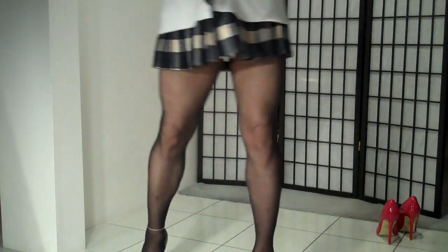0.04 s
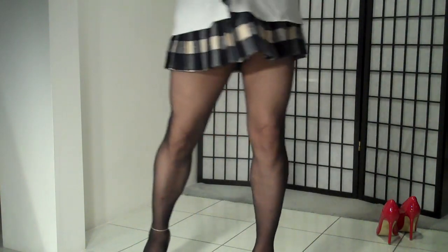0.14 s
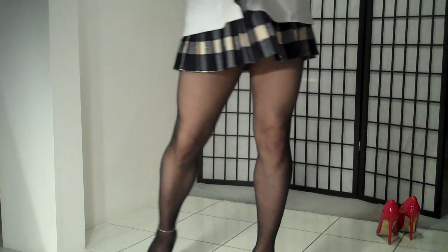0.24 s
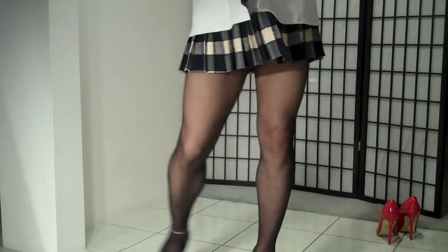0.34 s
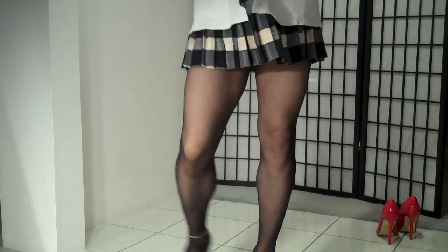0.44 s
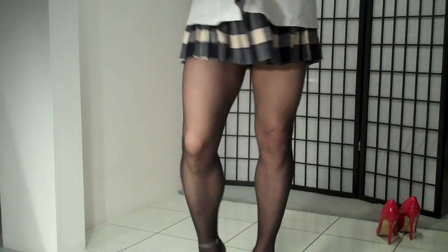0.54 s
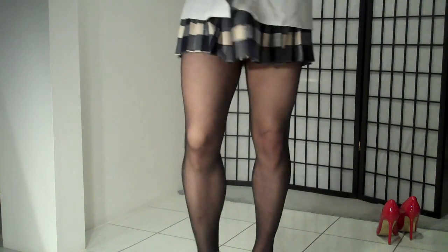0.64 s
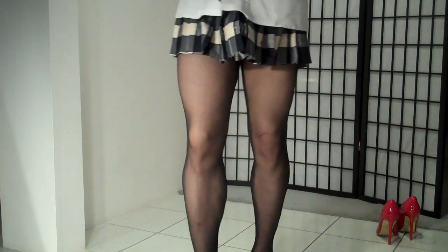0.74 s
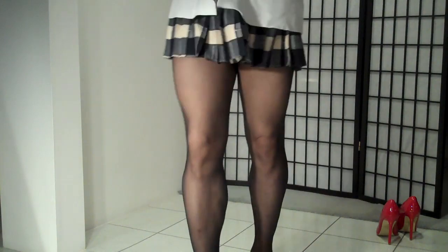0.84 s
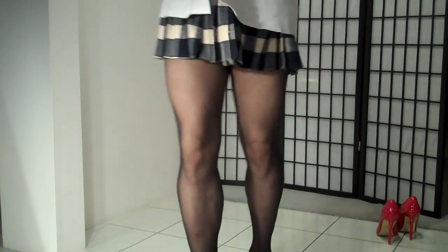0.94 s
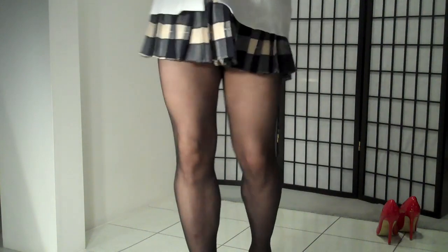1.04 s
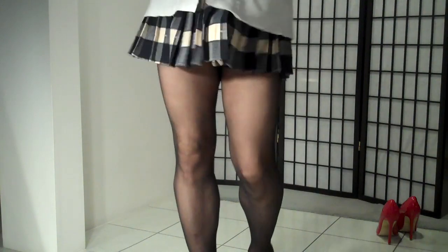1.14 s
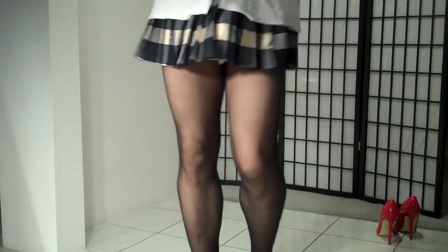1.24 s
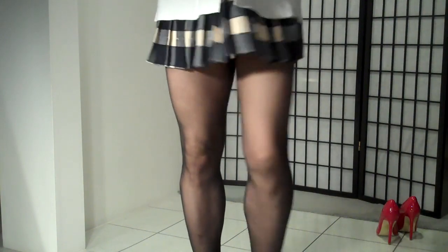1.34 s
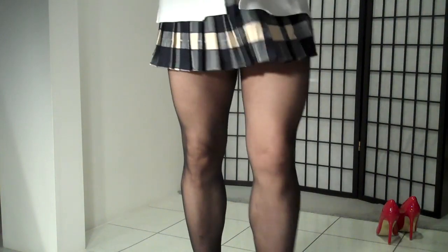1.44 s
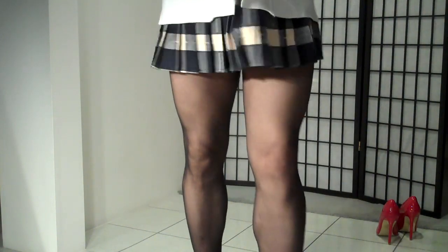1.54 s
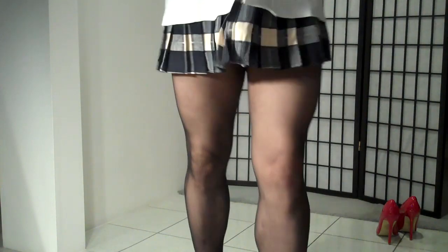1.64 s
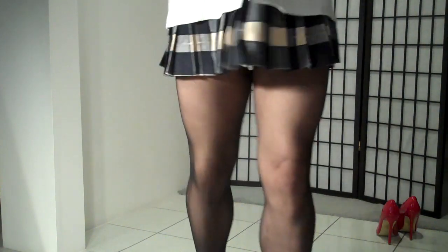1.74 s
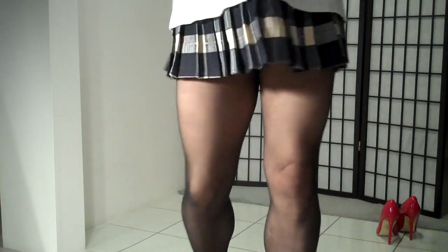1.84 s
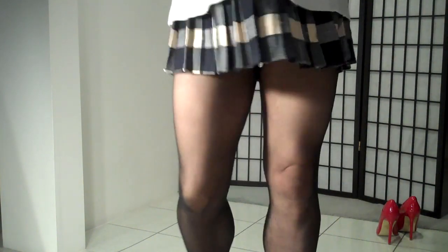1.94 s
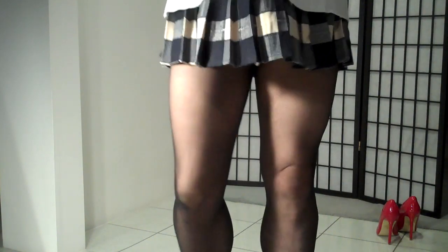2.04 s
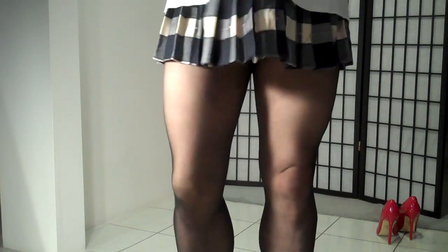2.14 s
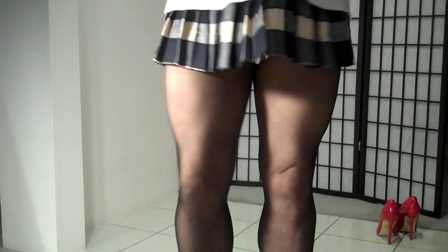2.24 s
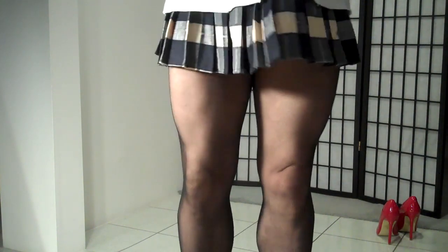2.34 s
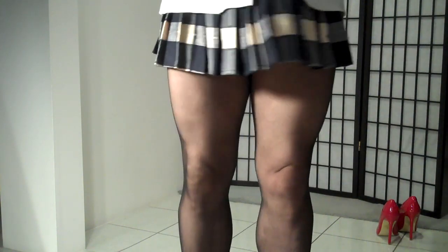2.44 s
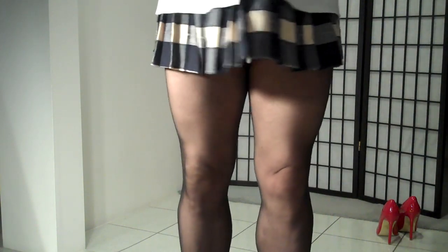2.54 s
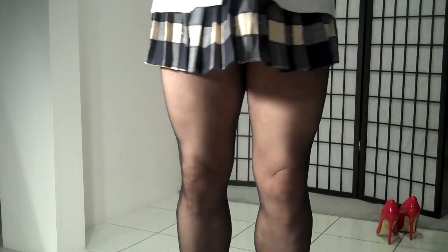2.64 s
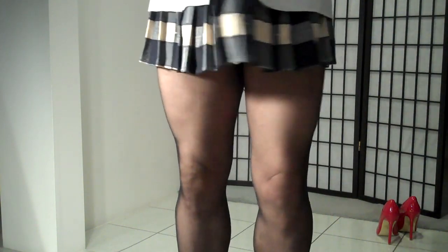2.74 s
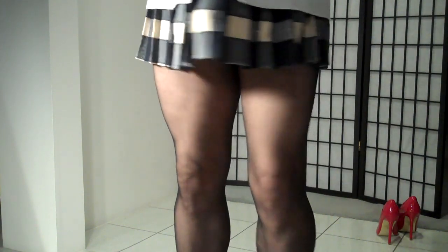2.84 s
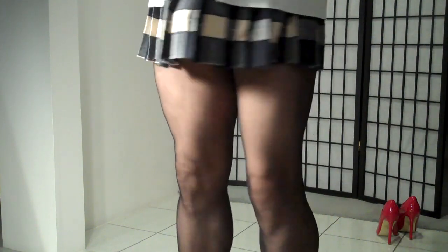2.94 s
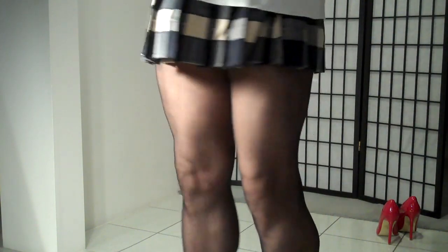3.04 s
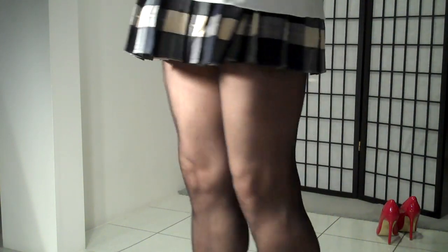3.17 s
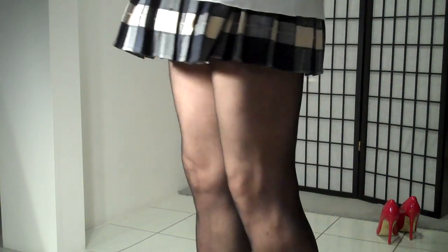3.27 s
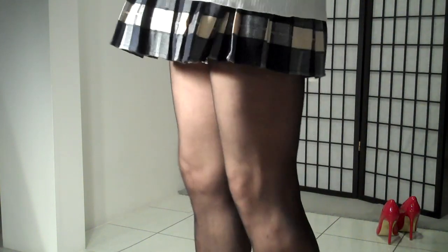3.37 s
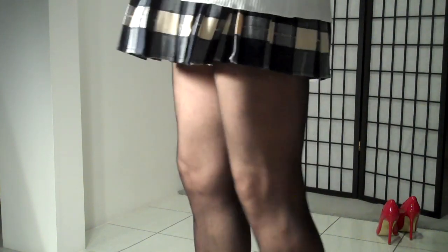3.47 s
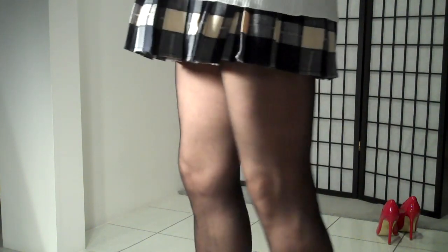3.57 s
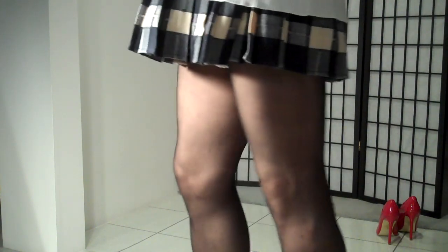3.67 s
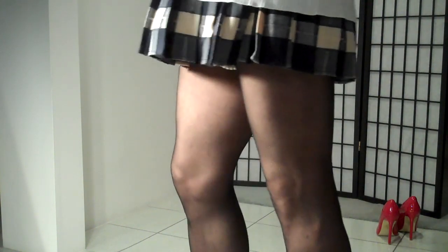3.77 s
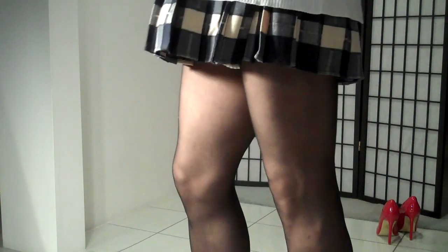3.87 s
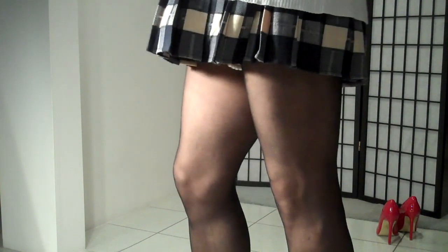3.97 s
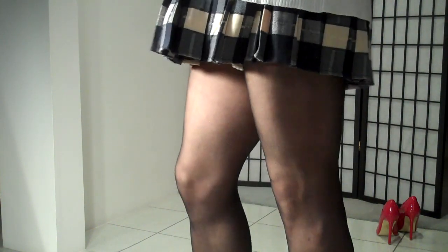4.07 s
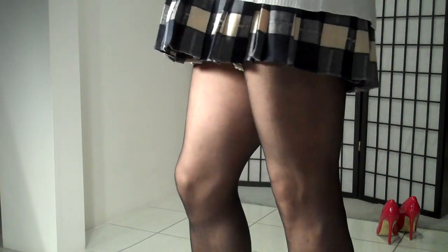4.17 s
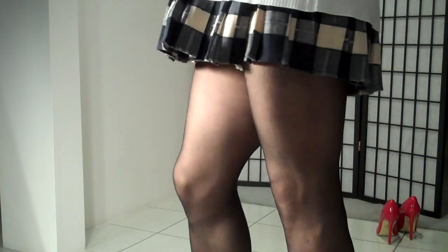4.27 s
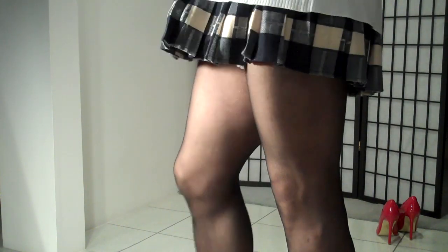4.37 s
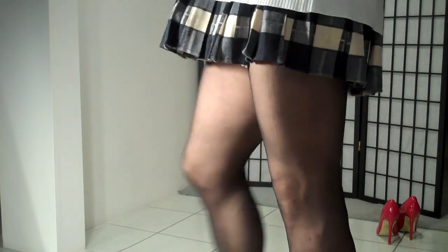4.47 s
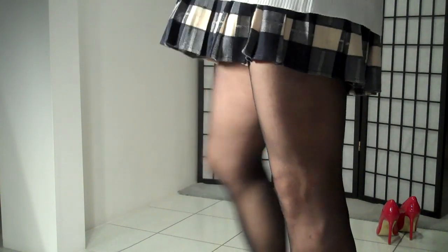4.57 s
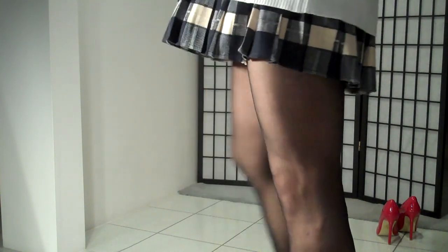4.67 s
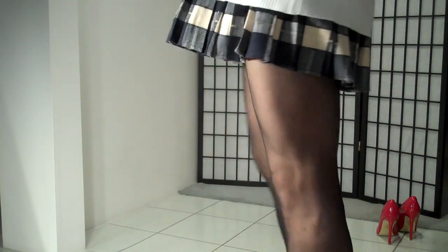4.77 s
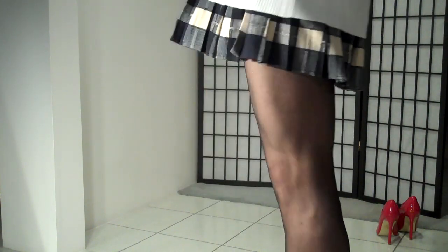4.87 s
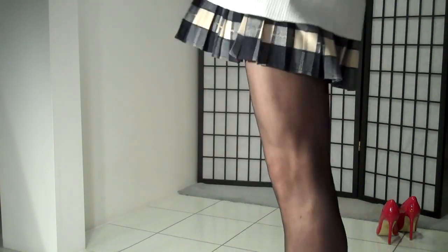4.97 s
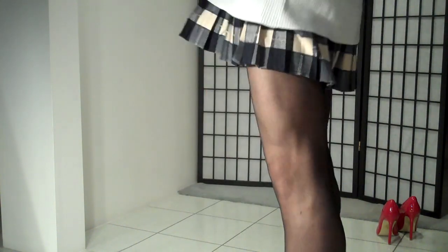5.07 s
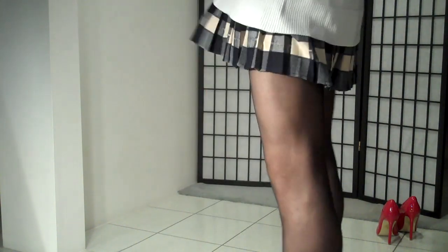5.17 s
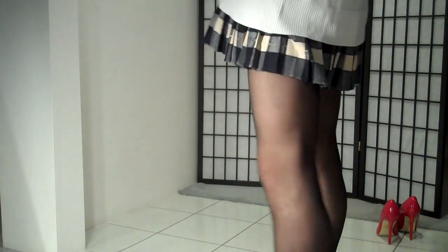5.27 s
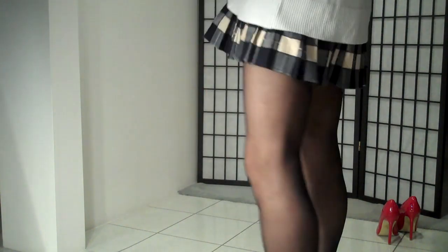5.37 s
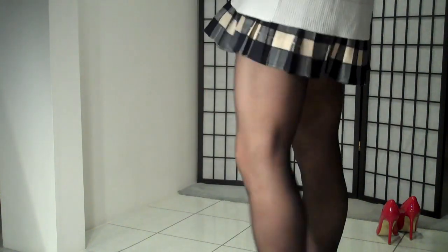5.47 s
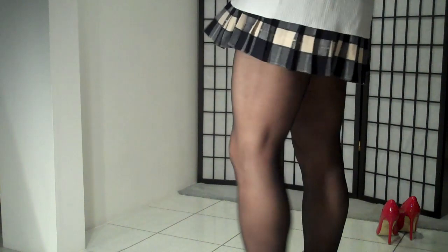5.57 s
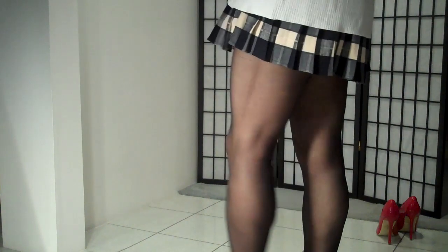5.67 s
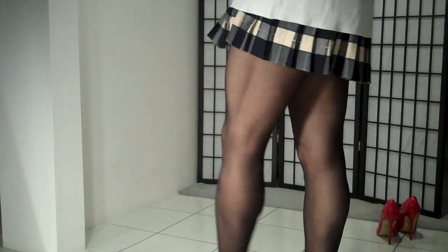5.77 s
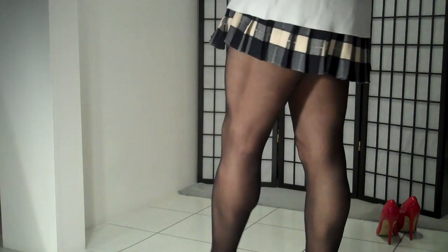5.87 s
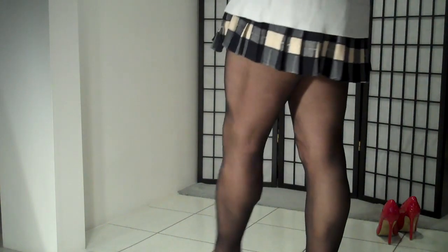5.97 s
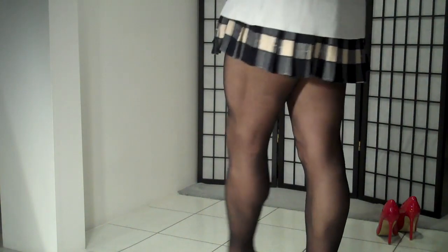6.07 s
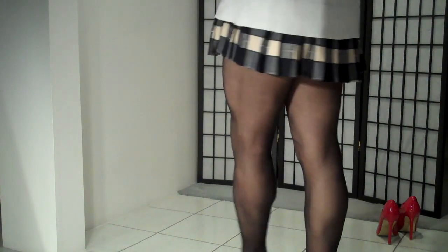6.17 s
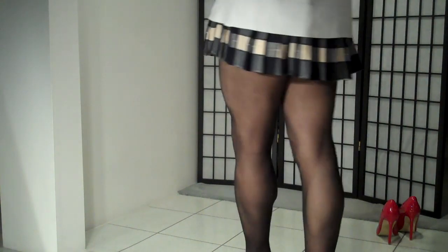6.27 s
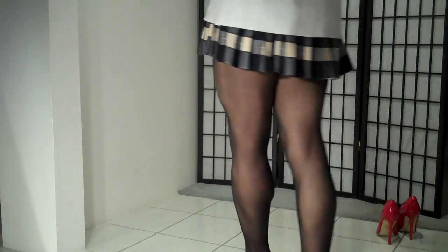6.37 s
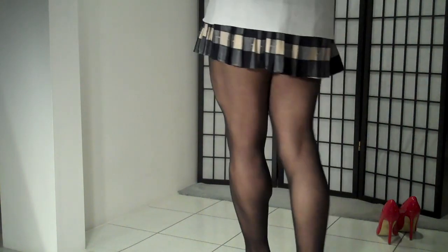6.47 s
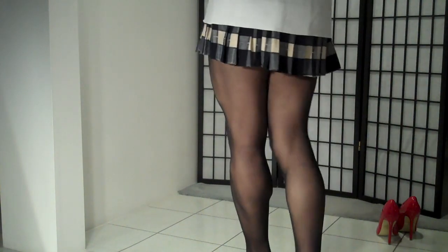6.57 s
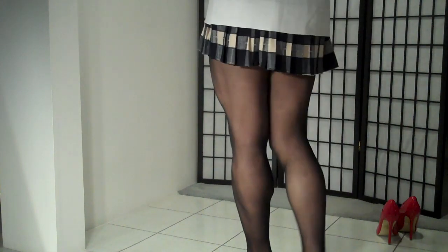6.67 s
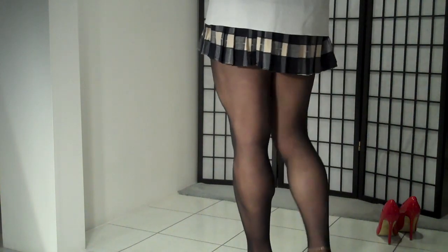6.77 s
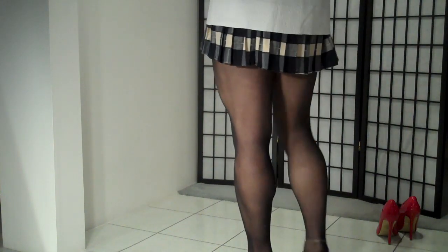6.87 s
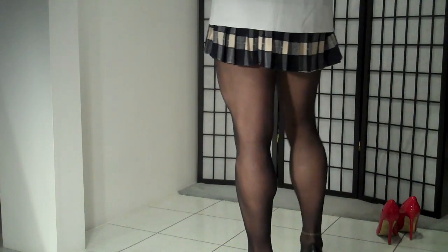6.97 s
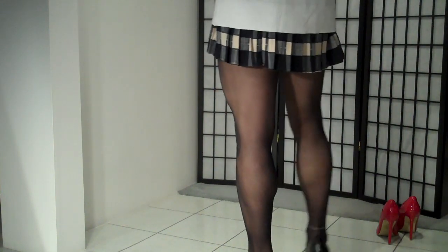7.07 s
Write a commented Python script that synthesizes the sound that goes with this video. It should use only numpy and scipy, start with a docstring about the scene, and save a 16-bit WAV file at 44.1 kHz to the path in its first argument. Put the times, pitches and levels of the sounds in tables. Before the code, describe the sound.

A person in high heels shifts weight and turns on hard tile. Woody, hollow footfalls with small clicks vary from faint taps to firm thuds, separated by fine fabric hiss and brief sole scuffs. Sharp bright snaps appear early and again near the end. The room is small and lively, the ventilation very quiet, and the small stereo microphone adds a thin, ringing treble edge with light hiss.

```python
"""Someone in high heels steps and turns on a tiled floor in a small bare room, over faint ventilation noise.
First stockings and skirt swish (shaped noise), as they do again between steps. Then heels and soles
knock on the tiles: each blow is one short pulse of knock, thump, rings and tick. Soon hard shoe edges snap
(bright pulses) and soles scuff (runs of tiny slips). Snaps and swishes return before the last step.
All is heard through two small microphone ports that ring in the treble."""
import sys
import numpy as np
from scipy import signal
from scipy.fft import rfft, irfft, next_fast_len
from scipy.io import wavfile

SR = 44100
rng = np.random.default_rng(int(sys.argv[2]) if len(sys.argv) > 2 else 0)


def persist_wave(psi):
    """Save psi, clipped to +-1, as 16-bit WAV."""
    counts = np.round(np.clip(psi, -1, 1) * 32767).astype(np.int16)
    wavfile.write(sys.argv[1], SR, np.atleast_2d(counts).T)


N = 313551  # samples in the scene
SIZE = 16384  # samples in one blow with its reverberation
LONG = next_fast_len(N + 4096, True)  # the scene with spare room at the end
T = np.arange(SIZE) / SR
HZ = np.fft.rfftfreq(SIZE, 1 / SR)
LONG_HZ = np.fft.rfftfreq(LONG, 1 / SR)

# Levels in the tables are relative: the ports and other settings still act on them.
# Ventilation: [f/Hz, level/dB]
VENT_COLOUR = [(20, -61), (60, -51.5), (130, -55.5), (190, -56), (222, -43.5), (248, -46), (280, -47),
               (340, -54.5), (700, -59), (1500, -60.5), (4000, -65), (7000, -72), (14000, -83)]
# Ventilation, left against right: [f/Hz, difference/dB]
VENT_LEFT_RIGHT = [(100, 0), (250, 0), (500, 12), (1000, 12.5), (2200, 9.5), (5000, 3.5)]
# How alike diffuse sound is at left and right: [f/Hz, likeness from 0 to 1]
LIKENESS = [(25, 0), (70, 0.092), (140, 1), (300, 0.84), (600, 0.91), (1100, 0.72), (2200, 0.38),
            (4500, 0.11), (12000, 0.61)]

# Time the reverberation takes to fall by 60 dB: [f/Hz, fall time/s]
ROOM_FALL_TIME = [(100, 0.14), (260, 0.44), (700, 0.3), (1840, 0.33), (4850, 0.27), (8000, 0.25),
                  (14000, 0.31)]
# Colour of the scattered reflections: [f/Hz, level/dB]
ROOM_COLOUR = [(40, -19), (85, 4), (130, 1.5), (230, 2.5), (320, 4), (420, 1), (800, 6), (2000, 6.5),
               (7000, 4), (14000, 9)]
# Standing waves between the walls: [f/Hz, level/dB, time to fall 60 dB/s]
STANDING_WAVES = [(125.5, -21.5, 0.17), (224.3, -21.5, 0.41), (416, -30.5, 0.68), (567, -38, 0.63),
                  (629, -15, 0.17), (908, -24, 0.26), (1013, -25, 0.48), (1163, -17.5, 0.46)]
# First echoes, from legs, screen and walls: [delay/s, level/dB]
FIRST_ECHOES = [(.0019, -9.5), (.0037, -20), (0.0103, -10), (0.0136, -32)]
# Room against direct sound, as the walker comes closer and turns away: [t/s, level/dB]
STEP_ROOM_LEVEL = [(.7, -1.5), (2, -3), (4.8, -4.5), (5.4, 1), (6, 0.9), (7.1, -3)]

# Cloth sliding as a leg swings or the hips turn:
# [fastest moment t/s, length/s, stocking fizz level/dB, skirt rustle level/dB]
CLOTH_SWISHES = [(0.147, .05, -64.5, -76), (0.503, 0.11, -61, -66), (0.876, 0.071, -53, -56.5),
                 (.96, 0.078, -49.5, -60), (1.12, .075, -54, -65.5), (1.426, 0.16, -64, -68),
                 (1.614, 0.071, -58.5, -61.5), (1.7, 0.078, -55.5, -61.5), (1.796, 0.33, -65, -70),
                 (2.11, 0.1, -52, -62.5), (2.178, 0.043, -49.5, -74), (2.372, .1, -57, -80),
                 (2.495, 0.076, -52.5, -61.5), (2.684, 0.11, -55, -59.5), (2.88, 0.2, -55, -61),
                 (3.036, 0.21, -57, -59), (4.16, 0.23, -66.5, -76), (4.239, 0.048, -63, -57.5),
                 (4.52, 0.041, -70, -61.5), (4.93, .18, -65, -68), (5.172, 0.042, -62.5, -64.5),
                 (5.49, 0.31, -62, -69), (5.72, 0.1, -67, -76), (6.247, 0.13, -60, -63.5),
                 (6.45, 0.13, -52, -60.5), (6.536, 0.099, -40.5, -56), (6.635, 0.092, -50.5, -62.5)]
# Fine stocking noise: [f/Hz, level/dB]
FIZZ_COLOUR = [(300, -42), (2500, -6.5), (5000, -4.5), (7000, -3), (10000, -3), (15000, 2.5)]
# Coarser skirt noise: [f/Hz, level/dB]
RUSTLE_COLOUR = [(100, -15), (500, 2.5), (1100, 5.5), (1800, 4.5), (2600, 7), (4200, 3), (6500, -8),
                 (15000, -22)]

# A sole dragging over grit: [t/s, length/s, level/dB, extra body below about 3 kHz/dB]
SOLE_SCUFFS = [(.9905, 0.0031, -40.5, 0), (4.2325, 0.015, -48, -1), (4.694, 0.015, -61.5, 24)]
# Grit on the glaze: [f/Hz, level/dB]
GRIT_COLOUR = [(300, -30), (1500, -13), (2800, 1), (4200, -3), (5600, 0), (7000, -6), (10000, -10),
               (15000, -12)]

# Hard shoe edges snapping:
# [t/s, level/dB, extra body below about 3.8 kHz/dB, left against right/dB, room level/dB]
EDGE_SNAPS = [(0.847, -32.5, 26.5, 4, 1), (.8645, -14.5, 12, -3, -2.5), (0.8656, -16.5, 15, -2, -2),
              (2.0668, -17, 10.5, -2, -4.5), (2.0774, -2.5, -16, 8.5, -8.5), (2.0792, -18.5, 7, 4, 2),
              (2.091, -12.5, 0, 0, -13), (6.091, -6.5, 4.5, -1, -6), (6.1255, -32, 27.5, 5, 2)]
# One snap: [f/Hz, level/dB]
SNAP_COLOUR = [(200, -20.5), (1500, -16.5), (2800, -12), (4200, -6.5), (5500, -4), (6800, -1.5),
               (10000, -12.5), (15000, -11)]

# Footfalls: [t/s, knock level/dB, contact hardness f/Hz, floor thump level/dB, sole ring level/dB,
# tile ring level/dB, ring pitch f/Hz, heel-tip tick level/dB]
FOOTFALLS = [(0.6674, 3, 706, -5, -1, 3, 566, -41), (0.6738, -15, 1800, -7, -20, -22, 600, -20),
             (0.7136, -28, 1500, -13, -23, -27, 575, -31), (.923, -20, 1100, -33, -7.5, -8.5, 563, -27),
             (0.9916, -11, 1000, -17, -4, -13, 610, -25), (1.4803, -1, 1000, 0, -1, 6, 517, -28),
             (1.483, -10, 2600, -6, -1, -18, 540, -15.5), (1.9248, -17, 1700, -33, -25, -10, 643, -23),
             (2.0134, -9.5, 2320, -4, -0.5, -1.5, 604, -24), (2.3012, -13.5, 1000, -8, 3.5, -28, 599, -48),
             (2.596, -21.5, 1450, -37, -38, -21.5, 605, -32), (3.4855, -4, 1610, 5, 14, -14, 581, -17),
             (4.601, -9.5, 1800, 2.5, -22, -24, 575, -20), (4.695, -20.5, 1750, -28, -32, -30, 575, -36),
             (4.773, -18, 850, -22, -8.5, -21, 550, -39), (4.8123, -0.5, 1240, -5, 6, -16, 572, -27),
             (4.944, -20.5, 1000, -33, -20, -24, 557, -43), (5.4648, -7, 930, 2, 0.5, 1, 553, -22.5),
             (6.0096, -12, 1450, -3, -8, -21, 566, -25), (6.0337, -2, 1380, 6, 5, 12.5, 597, -16),
             (7.0713, -15, 1550, -3, -29, -16, 575, -22.5)]
# Hollow under the sole and the shoe's shank: [f/Hz, level/dB, time to fall 60 dB/s]
SOLE_RING = [(536, -8, 0.077), (588, -0.5, 0.028), (816, -9, 0.023), (1084, -17.5, 0.034),
             (1294, -12.5, 0.036), (2380, -17.5, 0.008), (3190, -18, 0.021)]
# A floor tile on its bed: [f/Hz, level/dB, time to fall 60 dB/s]
TILE_RING = [(237, -2.5, 0.047), (408, 0.5, 0.052), (933, -4.5, 0.022), (1930, -14.5, 0.018),
             (3130, -11, 0.014)]
# Body weight on the floor: [f/Hz, level/dB]
THUMP_COLOUR = [(30, -33), (80, -22.5), (125, 0), (200, 0.5), (320, -10), (600, -55), (2000, -78)]
# A heel tip on glaze: [f/Hz, level/dB]
TICK_COLOUR = [(100, -28), (1000, -16), (2000, 1), (2800, -1.5), (4300, -7), (6300, -9), (8000, -12.5),
               (10000, -16), (15000, -17)]

RING_HZ = 575  # ring pitch at which the two ring tables hold as written
ROLL_DB_PER_DB = 0.1573  # a lighter contact rolls down instead of striking, so more of it is tail
SWISH_EDGE_DB = -4.5  # level at the two ends of a swish, against its middle
SWISH_CURVE, SWISH_RISE = 1.8, 0.48  # bell shape; share of the length spent rising
EDGE_HZ = 14400  # upper band limit


def amp(db):
    """Turns decibels into a gain."""
    return 10 ** (np.asarray(db) / 20)


def read(points, hz):
    """Reads a table along straight lines on a log-frequency axis."""
    f, value = np.transpose(points)
    return np.interp(np.log(hz + 1), np.log(f + 1), value)


def add(mix, s, sound):
    """Lays a stereo sound into the mix at time s, in seconds."""
    part = mix[:, round(s * SR):][:, :SIZE]
    part += sound[:, :part.shape[1]]


def causal(gain):
    """Gives the spectrum of the most compact pulse with this gain, starting at once (minimum phase)."""
    log_gain = np.log(np.maximum(gain, 1e-5))
    both_sides = np.r_[log_gain, log_gain[-2:0:-1]]
    return np.exp(np.conj(signal.hilbert(both_sides)))[:len(gain)]


def modes(table, hz):
    """The spectrum of a few dying sines, each as loud at its own peak as its level says."""
    total = 0
    for f, db, t60 in table:
        detuning = (hz ** 2 - f ** 2) * np.pi * t60 / (np.log(1000) * (hz + 1))
        total = total + amp(db) / (1 + 1j * detuning)
    return total


def diffuse(pair, colour):
    """Colours two noises and mixes them to the left-right likeness found at two close ports."""
    length = pair.shape[1]
    hz = np.fft.rfftfreq(length, 1 / SR)
    a, b = rfft(pair)
    same = np.clip(read(LIKENESS, hz), -1, 1)
    mid = a * np.sqrt((1 + same) / 2)
    side = b * np.sqrt((1 - same) / 2)
    return irfft(np.array([mid + side, mid - side]) * amp(read(colour, hz)), length)


def ventilation():
    """Steady coloured noise makes a soft drone, even in the bass and clearly stronger on the left in the mids."""
    tilt_db = read(VENT_LEFT_RIGHT, LONG_HZ)
    drone = diffuse(rng.standard_normal((2, LONG)), VENT_COLOUR)
    return irfft(rfft(drone) * amp([tilt_db / 2, -tilt_db / 2]), LONG)[:, :N]


def room(build_s=0.0022, standing_build_s=0.0042):
    """Reverberation from one spot: scattered reflections, and standing waves that build up more slowly."""
    taps = rng.standard_normal((2, SIZE)) * (rng.random(SIZE) < .2)  # a fifth of the moments reflect
    hz, t, z = signal.stft(diffuse(taps / taps.std(), ROOM_COLOUR), SR, nperseg=256)
    t60 = read(ROOM_FALL_TIME, hz)[:, None]
    even_energy = np.sqrt(np.log(1e6) / (t60 * SR))  # a longer tail starts lower
    fading = z * amp(-60 * t / t60) * even_energy
    tail = signal.istft(fading, SR, nperseg=256)[1][:, :SIZE]
    standing = 0
    for f, db, ring_s in STANDING_WAVES:
        standing = standing + amp(db - 60 * T / ring_s) * np.sin(2 * np.pi * (f * T + rng.random()))
    standing = standing / np.sqrt(SR * 0.06)
    tail_build = 1 - np.exp(-(T / build_s) ** 2)
    standing_build = 1 - np.exp(-(T / standing_build_s) ** 2)
    return rfft(tail * tail_build + standing * standing_build)


def fabric(grain_db=1.0, grain_hz=260, fizz_db=-1, rustle_db=-1):
    """Threads catch and slip: fine fizz and coarser rustle swell with each movement, in small clumps."""
    t, power = np.arange(N) / SR, np.zeros((2, N))
    for s, length, *levels_db in CLOTH_SWISHES:
        near = abs(t - s) < 2 * length
        before, after = (s - t[near]) / SWISH_RISE, (t[near] - s) / (1 - SWISH_RISE)
        away = np.maximum(before, after) / length  # 0 at the fastest moment, 1 at either end
        swell = amp(SWISH_EDGE_DB * away ** SWISH_CURVE)
        power[:, near] += np.outer(amp(levels_db), swell) ** 2
    grains = np.interp(t * grain_hz, np.arange(N), rng.standard_normal(N))
    clumps = amp(grain_db * grains)
    fizz = diffuse(rng.standard_normal((2, LONG)), FIZZ_COLOUR)[:, :N]
    rustle = diffuse(rng.standard_normal((2, LONG)), RUSTLE_COLOUR)[:, :N]
    stocking = amp(fizz_db) * np.sqrt(power[0]) * fizz
    skirt = amp(rustle_db) * np.sqrt(power[1]) * rustle
    return clumps * (stocking + skirt)


def scuffs(rooms, grains_per_s=1500, room_db=-5):
    """A sole over grit makes a quick run of tiny slips that dies as the sole comes to rest."""
    out = np.zeros((2, N))
    for k, (s, length, db, body_db) in enumerate(SOLE_SCUFFS):
        slip_now = rng.random(SIZE) < grains_per_s / SR
        slips = rng.standard_normal(SIZE) * slip_now * np.exp(-T / length)
        # Set the energy, however many slips happened to fall.
        slips *= amp(db) * np.sqrt(length * SR / 2) / (np.linalg.norm(slips) + 1e-12)
        grit = causal(amp(read(GRIT_COLOUR, HZ) + body_db / (1 + (HZ / 3000) ** 4)))
        place = 1 + amp(room_db) * rooms[k % len(rooms)]
        add(out, s, irfft(rfft(slips) * grit * place))
    return out


def snaps(rooms):
    """Very short contacts of hard shoe edges make pulses rich in treble, some with added body."""
    out = np.zeros((2, N))
    for k, (s, db, body_db, pan_db, room_db) in enumerate(EDGE_SNAPS):
        pulse = causal(amp(db + read(SNAP_COLOUR, HZ) + body_db / (1 + (HZ / 3800) ** 4)))
        direct = amp([[pan_db / 2], [-pan_db / 2]])
        add(out, s, irfft(pulse * (direct + amp(room_db) * rooms[k % len(rooms)])))
    return out


def footfalls(rooms, shoe_hz=260, lowest_hz=88, lag_s=0.001053):
    """Each blow knocks, thumps the floor, rings sole and tile, and ticks at the heel tip."""
    out = np.zeros((2, N))
    thump, tick = amp(read(THUMP_COLOUR, HZ)), amp(read(TICK_COLOUR, HZ))
    early = sum(amp(db) * np.exp(-2j * np.pi * HZ * delay) for delay, db in FIRST_ECHOES)
    radiated = HZ / np.hypot(shoe_hz, HZ)  # a small shoe radiates little bass
    # A slab gives no deep boom.
    low = HZ / lowest_hz
    stiff_floor = low ** 2 / (1 + 1.1j * low - low ** 2)
    # Bending waves carry the treble ahead of the bass; lag_s is the delay at RING_HZ.
    bending = np.exp(-4j * np.pi * lag_s * np.sqrt(HZ * RING_HZ))
    for k, step in enumerate(FOOTFALLS):
        s, knock_db, hard_hz, thump_db, sole_db, tile_db, ring_hz, tick_db = step
        knock = amp(knock_db) * radiated / (1 + (HZ / hard_hz) ** 4.0)  # a shorter contact is brighter
        shifted_hz = HZ * RING_HZ / ring_hz  # the rings shift with the landing
        soft = 1 / (1 + (HZ / (1.83 * hard_hz)) ** 4)  # a soft landing spares the high rings
        sole = soft * amp(sole_db) * modes(SOLE_RING, shifted_hz)
        tile = soft * amp(tile_db) * modes(TILE_RING, shifted_hz)
        parts = knock, amp(thump_db) * thump, amp(tick_db) * tick, sole, tile
        total_gain = np.sqrt(sum(abs(part) ** 2 for part in parts))
        blow = stiff_floor * bending * causal(total_gain)
        room_db = np.interp(s, *np.transpose(STEP_ROOM_LEVEL)) - ROLL_DB_PER_DB * knock_db
        place = 1 + early + amp(room_db) * rooms[k % len(rooms)]
        add(out, s, irfft(blow * place))
    return out


def scene(count=7):
    """Puts shoes at several spots on the floor and adds clothes and the ventilation."""
    rooms = [room() for _ in range(count)]
    return ventilation() + fabric() + scuffs(rooms) + snaps(rooms) + footfalls(rooms)


def port(x, hz, q, top_db):
    """A microphone behind a small hole: the cavity resonates, and a shelf alters the top treble."""
    top = amp(top_db * (1 - 1 / (1 + (LONG_HZ / 8500) ** 6)))
    cavity = 1 / (1 - (LONG_HZ / hz) ** 2 + 1j * LONG_HZ / (hz * q))
    return irfft(rfft(x, LONG) * top * cavity, LONG)[:N]


def record(dry):
    """Passes the sound through two unequal ports, adds preamplifier hiss and limits the band."""
    left = port(dry[0], hz=7245, q=7.7, top_db=-1.0)
    right = amp(0.25) * port(dry[1], hz=6240, q=8.8, top_db=-16.5)
    hiss = amp(-63.0) * rng.standard_normal((2, N))
    low_pass = signal.firwin(511, EDGE_HZ, window=("kaiser", 8), fs=SR)
    return signal.oaconvolve(np.array([left, right]) + hiss, low_pass[None], "same")


dry = scene()
out = record(dry)
persist_wave(out)
```